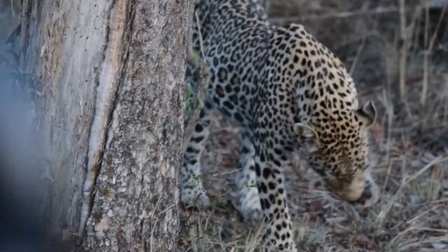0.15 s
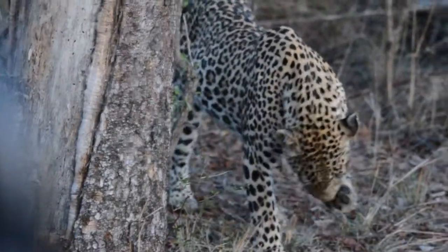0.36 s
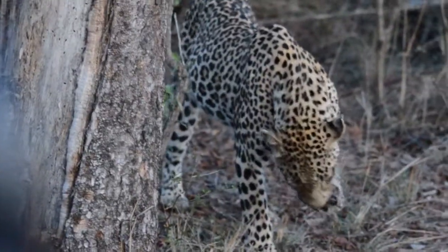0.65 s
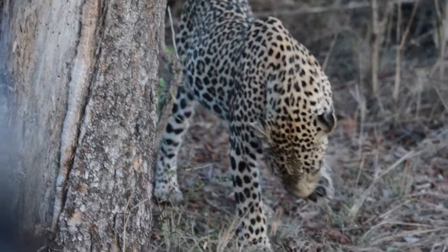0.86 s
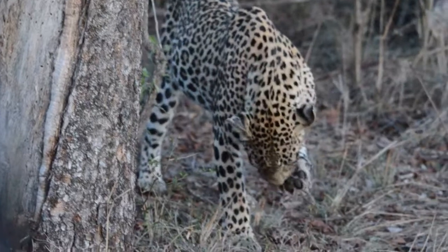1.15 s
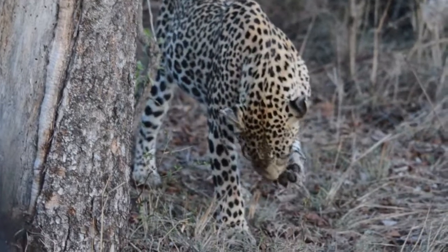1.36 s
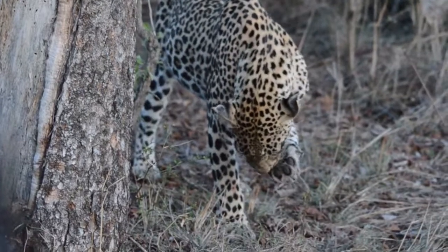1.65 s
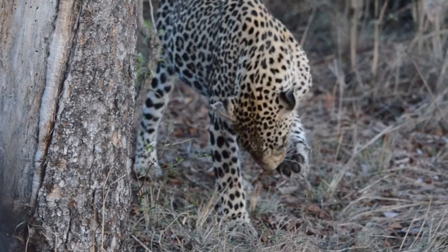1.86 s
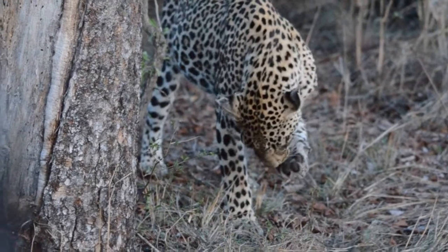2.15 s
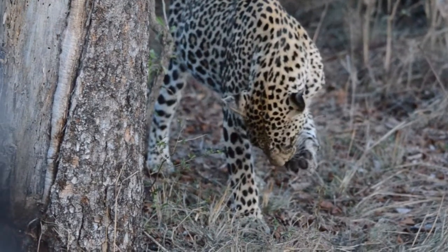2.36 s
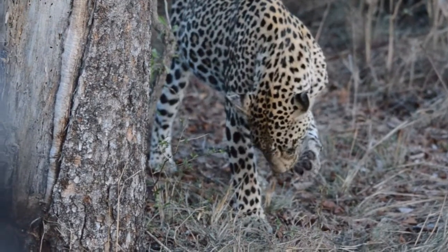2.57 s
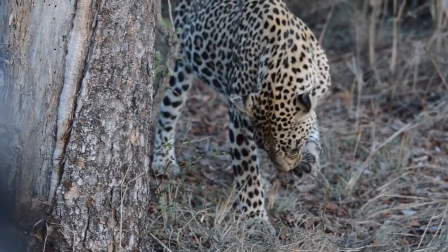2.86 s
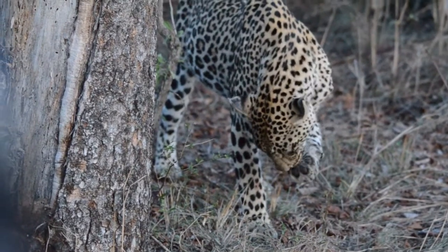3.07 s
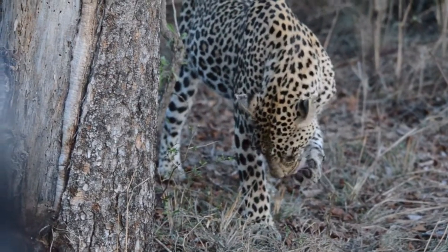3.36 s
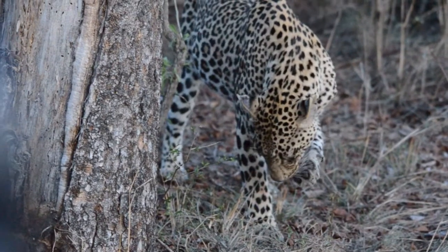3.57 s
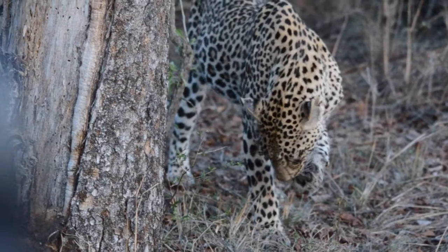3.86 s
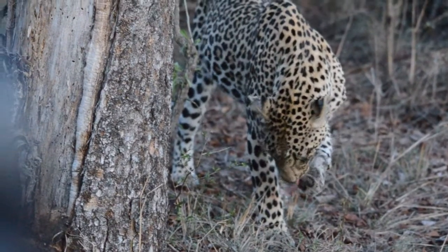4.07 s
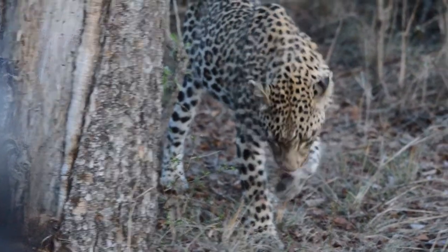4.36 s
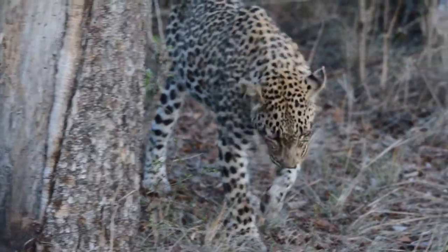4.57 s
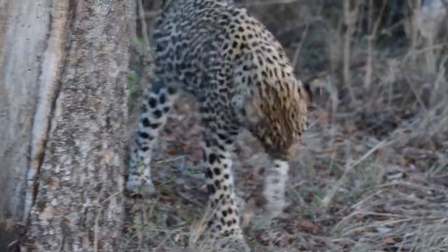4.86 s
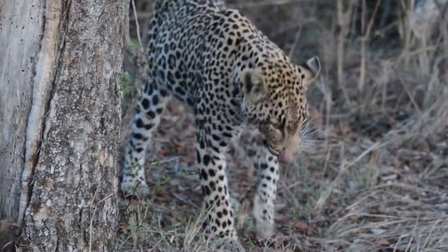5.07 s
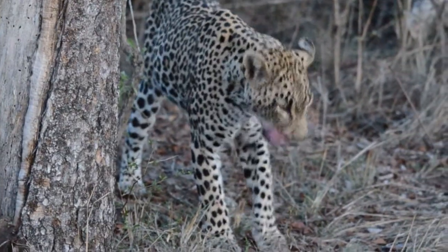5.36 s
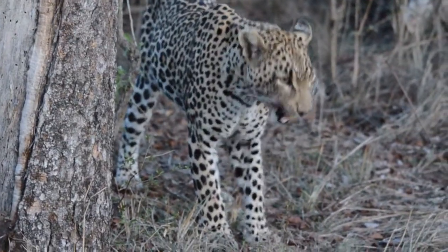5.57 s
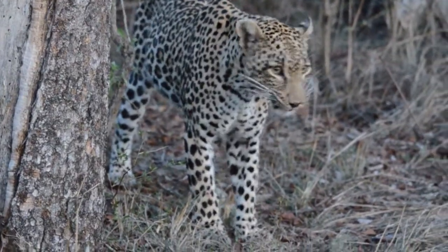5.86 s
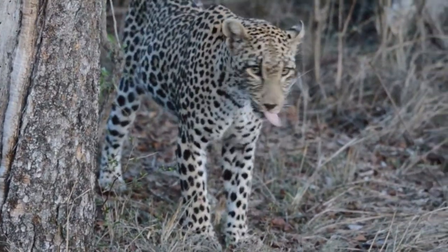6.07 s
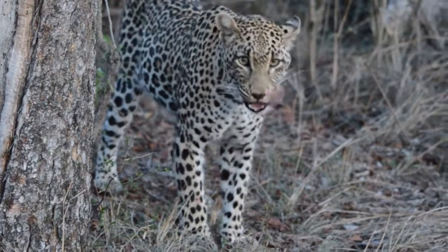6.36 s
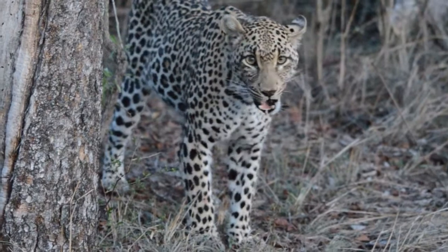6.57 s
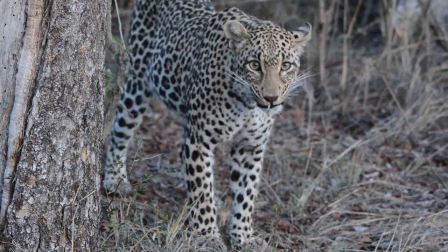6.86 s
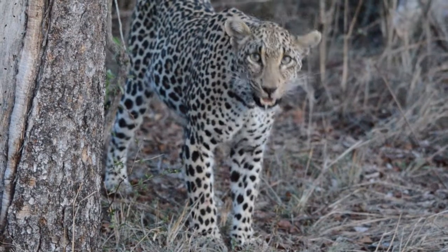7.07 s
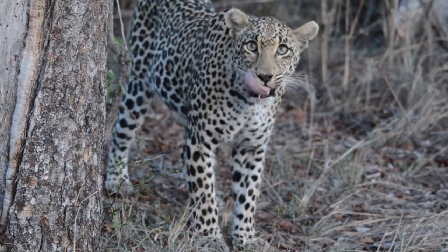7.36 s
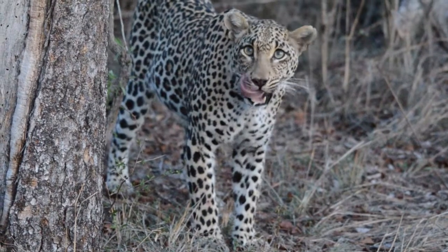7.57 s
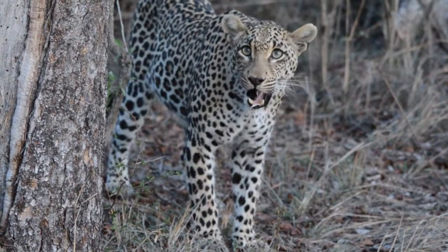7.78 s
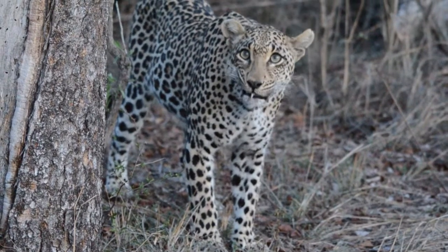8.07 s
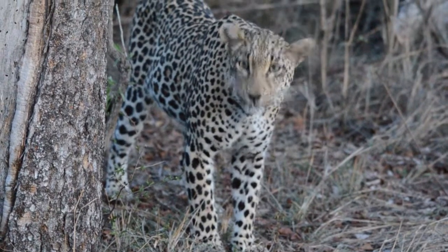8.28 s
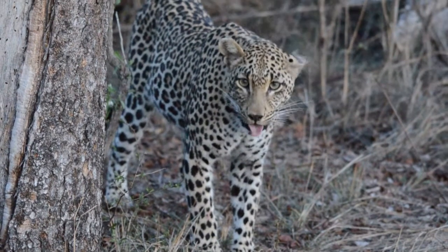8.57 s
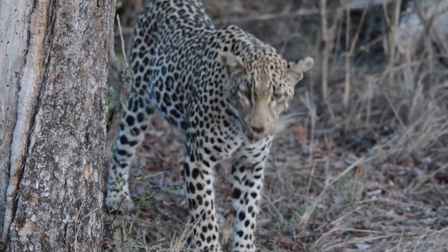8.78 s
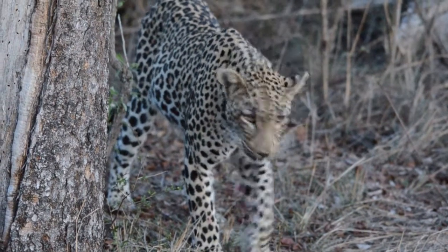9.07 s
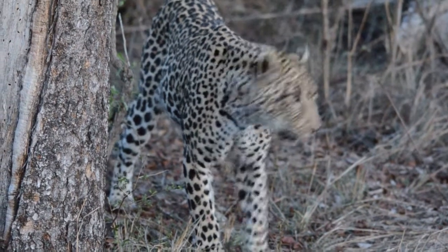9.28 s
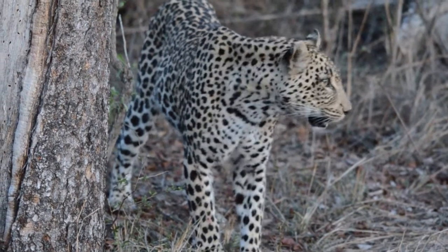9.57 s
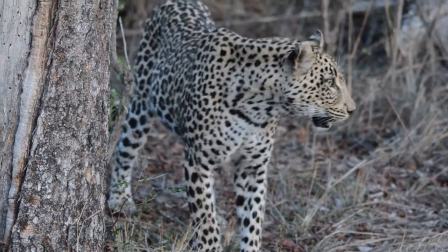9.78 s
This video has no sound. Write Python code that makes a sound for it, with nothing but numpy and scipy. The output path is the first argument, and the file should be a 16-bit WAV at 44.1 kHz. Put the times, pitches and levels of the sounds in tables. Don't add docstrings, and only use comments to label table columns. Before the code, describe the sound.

In dry open bush, cicadas keep up a very high, buzzing drone throughout. A ground bird a few steps away gives five quick calls, each a harsh squawk, falling whistle and short note echoing among trunks. Twigs crack nearby and fingers bump the handheld microphone. After four seconds the bird stops; a heavier thud and brief leaf swish follow, then faint distant birds chatter beneath the insects.

```python
import sys
import numpy as np
from scipy import signal
from scipy.fft import rfft, irfft, next_fast_len
from scipy.io import wavfile
from scipy.ndimage import uniform_filter1d

SR = 44100
rng = np.random.default_rng(int(sys.argv[2]) if len(sys.argv) > 2 else 0)


def dump(signal):
    limited = np.clip(np.atleast_2d(signal).T, -1, 1)
    pcm = np.round(limited * 32767).astype(np.int16)
    wavfile.write(sys.argv[1], SR, pcm)


def boost(x):
    u = np.asarray(x, float) / 20
    return 10 ** u


N = 437031
T = np.arange(N) / SR
EDGE_DB = 23

# (time [s], pitch [Hz], loudest after [s], level [dB], depth of the dips [dB])
FALLING_WHISTLES = [
    (0.443, 2416, 0.024, -28.5, 22),
    (1.205, 2420, 0.03, -29, 23),
    (1.972, 2423, 0.044, -29, 11),
    (2.723, 2420, 0.034, -30.5, 4),
    (3.533, 2409, 0.037, -29.5, 8),
]
# (full strength from [s], level [dB])
SHORT_NOTES = [(0.621, -34), (1.372, -33), (2.147, -33), (2.941, -34.5), (3.762, -34.5)]
# (full strength from [s], note level [dB], rasp level [dB])
OPENING_NOTES = [(0.043, -37, -43), (0.801, -35, -44.5), (1.547, -36, -44.5), (2.328, -34, -44.5),
                 (3.134, -33.5, -44.5)]


def rms_one(x):
    return x / np.sqrt(np.mean(x ** 2) + 1e-20)


def envelope(rows, column=1):
    rows, gain = np.array(rows), np.zeros(N)
    start, end = rows[0, 0], rows[-1, 0]
    at = slice(max(round(start * SR) - 400, 0), round(end * SR) + 400)
    fade = np.clip(np.minimum(T[at] - start, end - T[at]) / 0.004 + 1, 0, 1)
    gain[at] = fade * boost(np.interp(T[at], rows[:, 0], rows[:, column]))
    return gain


def burst(s, db, rise_s, hold_s, sag_db, fall_s):
    held_until, held_db = s + hold_s, db - sag_db
    return envelope([(s - rise_s, db - EDGE_DB), (s, db), (held_until, held_db),
                     (held_until + fall_s, held_db - EDGE_DB)])


def colour(x, spectrum):
    size = next_fast_len(N)
    hz, db = np.transpose(spectrum)
    gain = boost(np.interp(np.log(np.fft.rfftfreq(size, 1 / SR) + 1), np.log(hz), db))
    return rms_one(irfft(rfft(x, size) * gain, size)[:N])


def drift(rate):
    r = np.exp(-80 * np.pi * rate / SR)
    slow = signal.lfilter([1], [1, -2 * r, r * r], rng.standard_normal(N // 40 + 2002))[2000:]
    return np.interp(np.arange(N) / 40, np.arange(len(slow)), rms_one(slow))


def resonance(x, hz, width):
    r = np.exp(-np.pi * width / SR)
    poles = [1, -2 * r * np.cos(2 * np.pi * hz / SR), r * r]
    return signal.lfilter(np.array([1, 0, -1]) * (1 - r * r) / 2, poles, x)


def ring(clicks, hz, t60):
    r, w = boost(-60 / (t60 * SR)), 2 * np.pi * hz / SR
    return signal.lfilter([0, np.sin(w)], [1, -2 * r * np.cos(w), r * r], clicks + 1e-18)


def scatter(x, t60):
    t = T[:SR]
    tail = rng.standard_normal(SR) * boost(-60 * t / t60) * np.clip(t / (0.035 * t60), 0, 1)
    return signal.fftconvolve(x, tail / np.sqrt(np.sum(tail ** 2)))[:N]


def glides(notes, rough_db):
    out, waver = np.zeros(N), 1 + 0.0023 * drift(49.4)
    for s, length, start_hz, end_hz, db in notes:
        at = slice(round(s * SR), min(round((s + length) * SR), N))
        along = (T[at] - s) / length
        hz = start_hz + (end_hz - start_hz) * along
        phase = 2 * np.pi * np.cumsum(hz * waver[at]) / SR
        out[at] += boost(db) * np.clip(np.sin(np.pi * along), 0, 1) ** 0.04 * np.sin(phase)
    return out * boost(rough_db * drift(27))


def air():
    # (frequency [Hz], level [dB per Hz])
    hush_spectrum = [(15, -40), (25, -4), (366, 0), (579, -1), (1230, -2.5), (1590, -4.5), (2400, -2.5),
                     (3710, -15), (5230, -10), (5600, -19), (6000, -3), (7800, -51), (13200, -120)]
    # (time [s], level [dB])
    stirring = [
        (0.0, -62),
        (0.25, -60.5),
        (1.38, -63.5),
        (2.34, -59.5),
        (2.76, -61),
        (3.31, -56.5),
        (3.97, -61.5),
        (7.7, -67.5),
        (9.91, -68),
    ]
    hush = colour(rng.standard_normal(N), hush_spectrum)
    return envelope(stirring) * boost(3.0 + 1.0 * drift(9.9)) * hush


def chatter():
    # (loudest at [s], level [dB], rise [s], fall [s])
    swells = [(4.0, -70, 0.027, 0.14), (4.368, -52.5, .08, 0.082), (4.66, -63, 0.033, 0.025),
              (4.9, -49, .02, 0.14), (5.6, -62, .1, 0.079), (5.95, -59, 0.27, .4), (6.4, -75, .1, .1),
              (6.66, -67, .08, .04), (6.81, -65, .1, 0.021), (7.13, -65, .15, 0.16), (7.28, -62, .02, .04),
              (7.43, -62, .07, 0.02), (7.57, -62, 0.22, 0.063), (7.73, -60, .06, 0.062),
              (7.95, -52.5, 0.29, 0.032), (8.12, -56, .03, 0.11), (8.33, -59, .02, 0.17),
              (8.52, -55, 0.081, 0.32), (9.14, -57, 0.078, 0.42), (9.84, -60, .15, .4)]
    white = rng.standard_normal(N)
    bands = np.zeros(N)
    for hz in (1850, 2060, 2250, 2450, 2650, 2850, 3050):
        narrow = resonance(resonance(white, hz, 187), hz, 184)
        bands += boost(5.0 * drift(18)) * narrow
    bands /= np.sqrt(uniform_filter1d(bands ** 2, size=3000))
    gain = sum(burst(s, db, rise, 0, 0, fall) for s, db, rise, fall in swells)
    return gain * boost(-8.0) * bands


def cicadas():
    # (time [s], level [dB])
    chorus = [(0.0, -37), (0.22, -36), (1.43, -35.5), (1.57, -37.5), (1.87, -37), (1.93, -35.5),
              (1.99, -37.5), (3.89, -36), (4.14, -38.5), (4.74, -37), (4.86, -41.5), (4.94, -36.5),
              (5.57, -39), (5.66, -36.5), (5.74, -37.5), (9.69, -37), (9.74, -36), (9.91, -37)]
    # (tymbal strokes [per s], share [dB], rate wobble [0-1], later ribs [dB])
    singers = [
        (433, -3, .013, -14),
        (319, 0, .0065, -6),
        (368, -7, .008, -6),
        (276, -8, .008, -4),
    ]
    later_ribs = [.33, .6]
    # (frequency [Hz], level [dB per Hz])
    body = [(2530, -41), (4980, -32.5), (5690, -29.5), (6120, -24.5), (6710, -22.5), (7500, -12),
            (8300, -5.5), (9250, -0.5), (9860, -3), (11000, -11), (11800, -22.5), (12400, -29),
            (13000, -37.5), (14300, -48), (16700, -80), (22000, -120)]
    # (frequency [Hz], width [Hz], level [dB])
    fine_modes = [(6070, 96, -1), (7040, 90, 11), (7150, 130, 1), (7700, 150, -5), (7980, 80, -2),
                  (8250, 120, 4), (8720, 94, -0.5), (9400, 130, 1), (9450, 94, 7.5), (9870, 62, -7),
                  (10500, 82, -5), (10900, 130, 6), (11520, 180, 7), (12540, 130, 8)]
    clicks = np.zeros(N)
    for rate_hz, share_db, wobble, ribs_db in singers:
        phase = np.cumsum(rate_hz * (1 + wobble * drift(14))) / SR
        strength = boost(share_db + 2.15 * drift(4.2) + 1.0 * rng.standard_normal(N))
        for place, rib_db in zip([0, *later_ribs], (0, ribs_db, ribs_db)):
            cycles = np.floor(phase - place * (1 + 0.022 * drift(1.5)))
            at = np.flatnonzero(np.diff(cycles) > 0)
            clicks[at] += strength[at] * boost(rib_db)
    clicks = rms_one(signal.sosfilt(signal.butter(4, 5900, "high", fs=SR, output="sos"), clicks))
    sway = 2 * drift(1.5)
    blur = np.cos(sway) * scatter(clicks, t60=0.038) + np.sin(sway) * scatter(clicks, t60=0.038)
    heard = clicks + boost(-3) * blur + boost(-3.5) * rng.standard_normal(N)
    ripple = sum(boost(db + 2.1 * drift(5.0)) * resonance(heard, hz, width) for hz, width, db in fine_modes)
    drone = colour(heard + 0.11 * ripple, body)
    drone /= np.sqrt(uniform_filter1d(drone ** 2, size=4000))
    return envelope(chorus) * boost(0.44 + 0.78 * drift(3.5)) * drone


def far_birds():
    # (time [s], length [s], start [Hz], end [Hz], level [dB])
    small_bird = [
        (2.887, 0.026, 5750, 6550, -50),
        (2.909, .022, 6550, 6700, -44.5),
        (2.935, 0.032, 5200, 5120, -40.5),
    ]
    # (time [s], length [s], start [Hz], end [Hz], level [dB])
    far_notes = [(4.06, .11, 1880, 1870, -64), (4.913, .105, 2792, 2782, -62),
                 (5.018, .112, 2781, 2776, -67), (5.106, .03, 1940, 1620, -65),
                 (5.501, .029, 2590, 2481, -60), (5.529, .091, 2472, 2488, -59),
                 (6.301, .048, 2555, 2452, -60), (6.346, .074, 2451, 2452, -59),
                 (6.481, .058, 2461, 2459, -67), (7.066, .069, 2655, 2352, -59),
                 (7.101, .094, 2495, 2432, -61), (7.136, .035, 2340, 1860, -64),
                 (7.415, .025, 2395, 2255, -64), (7.716, .041, 2645, 2455, -62),
                 (7.821, .034, 3090, 2955, -68), (7.881, .088, 2488, 2462, -62),
                 (7.929, .052, 2152, 2148, -67), (8.212, .049, 2390, 2255, -66),
                 (8.461, .022, 3052, 3048, -68), (8.468, .026, 2480, 2420, -64),
                 (8.491, .094, 3058, 3032, -63), (8.492, .044, 2058, 2042, -68),
                 (8.576, .03, 2355, 2420, -63), (8.671, .079, 2452, 2441, -63),
                 (8.758, .028, 2122, 2102, -68), (9.071, .031, 4062, 4068, -62),
                 (9.076, .034, 2455, 2342, -59), (9.089, .021, 3552, 3542, -65),
                 (9.116, .109, 3048, 3002, -65), (9.121, .045, 2068, 2062, -68),
                 (9.126, .019, 3552, 3548, -68), (9.131, .031, 4058, 4052, -62),
                 (9.176, .054, 3562, 3552, -69), (9.541, .022, 1660, 1650, -68),
                 (9.666, .036, 3340, 3190, -66), (9.697, .046, 2475, 2382, -58),
                 (9.751, .035, 2472, 2498, -55), (9.772, .088, 2372, 2352, -58),
                 (9.791, .08, 2562, 2568, -65), (9.801, .109, 3010, 2945, -58)]
    # (time [s], length [s], start [Hz], end [Hz], level [dB])
    hoarse_chirps = [(4.861, .034, 2452, 2468, -64), (5.051, .049, 2495, 2402, -66),
                     (5.061, .039, 2005, 2195, -67), (5.436, .024, 2195, 2102, -65),
                     (5.631, .024, 2152, 2168, -64), (6.581, .039, 2052, 2195, -67),
                     (6.641, .039, 2445, 2302, -65), (6.781, .039, 2495, 2105, -66),
                     (6.782, .019, 2852, 2848, -67), (7.001, .024, 2545, 2305, -66),
                     (7.271, .024, 2102, 2098, -64), (7.286, .029, 2552, 2598, -65),
                     (7.371, .049, 1855, 2045, -65), (7.421, .024, 2802, 2828, -65),
                     (7.481, .019, 2148, 2102, -66), (8.096, .019, 1905, 2045, -66),
                     (8.116, .044, 2645, 2505, -65), (8.316, .024, 2102, 2195, -66),
                     (8.331, .034, 2405, 2645, -66), (8.366, .029, 2298, 2282, -67),
                     (8.406, .024, 2448, 2432, -66), (8.511, .075, 2795, 2722, -61),
                     (8.521, .069, 2945, 2882, -66), (8.601, .069, 2545, 2452, -65),
                     (8.621, .049, 2145, 2052, -66), (8.861, .024, 2002, 2028, -66),
                     (9.061, .029, 3245, 3152, -67), (9.111, .059, 2495, 2452, -65),
                     (9.131, .079, 2895, 2722, -61), (9.201, .039, 2445, 2252, -63),
                     (9.787, .019, 3495, 3152, -64), (9.801, .099, 2145, 2052, -65),
                     (9.851, .058, 3595, 3305, -66)]
    clear = glides([*small_bird, *far_notes], rough_db=2.0) * (1 + 0.15 * drift(70))
    return clear + glides(hoarse_chirps, rough_db=2.0) * (0.6 + 0.8 * drift(110))


def creaks():
    # (time [s], length [s], start [Hz], end [Hz], level [dB])
    seat = [
        (3.09, 0.25, 112, 114, -58),
        (3.37, 0.086, 255, 292, -60.5),
    ]
    return glides(seat, rough_db=2.5)


def bumps():
    # (time [s], peak level [dB], pitch [Hz])
    knocks = [(0.37, -53, 263), (0.428, -59, 367), (0.498, -54, 233), (1.521, -48, 640),
              (1.609, -62, 127.7), (2.339, -62, 715), (2.754, -57, 594), (3.014, -47, 339),
              (3.389, -54, 264), (3.519, -46.5, 429), (4.028, -50, 103), (4.388, -46.5, 250),
              (4.683, -35.5, 133), (4.831, -51, 186), (5.079, -50, 91.5), (5.415, -46.5, 194),
              (5.769, -50, 258), (0.55, -52, 100), (0.599, -54, 95), (4.875, -49, 90), (5.44, -54, 80),
              (5.76, -48, 90)]
    out = np.zeros(N)
    t = T[:SR // 10]
    for s, db, hz in knocks:
        knock = np.sin(2 * np.pi * hz * t) + 0.5 * np.sin(2 * np.pi * 1.56 * hz * t)
        out[round(s * SR):][:len(t)] += boost(db + 5.5 - 60 * t / 0.045) * np.clip(t / 0.0079, 0, 1) * knock
    return out


def rustle():
    # (loudest at [s], level [dB], rise [s], fall [s])
    rubs = [
        (0.0, -59, .01, 0.038),
        (.054, -50, .01, 0.17),
        (5.1, -65.5, 0.13, 0.038),
        (5.404, -66.5, 0.024, 0.23),
    ]
    rub = resonance(resonance(rng.standard_normal(N), 680, 1260), 680, 1260)
    gain = sum(burst(s, db, rise, 0, 0, fall) for s, db, rise, fall in rubs)
    return gain * boost(4.5 + 3.7 * drift(52)) * rms_one(rub)


def swish():
    # (time [s], level [dB])
    brush = [
        (4.675, -57),
        (4.705, -39),
        (4.755, -42),
        (4.897, -66.5),
        (4.915, -64),
        (4.95, -70),
    ]
    # (frequency [Hz], level [dB per Hz])
    leaf_spectrum = [(410, -26), (700, -16), (1020, -21), (1600, -6), (2480, -3.5), (2770, -8),
                     (4250, -1.5), (5620, -10), (9260, -11), (12900, -25), (16700, -55), (22000, -120)]
    grains = rng.standard_normal(N) * boost(4.0 * np.minimum(rng.exponential(1, N), 5))
    return envelope(brush) * boost(3.5) * colour(grains, leaf_spectrum)


def snaps():
    # (time [s], peak level [dB], low part [dB], splinter level [dB], splinter pitch [Hz])
    twigs = [
        (0.1764, -27, -18, -18, 8150),
        (1.9315, -11, -16, -40, 4700),
        (3.192, -25.5, -32, -17, 2950),
        (3.1925, -62, -20, -36, 14120),
        (3.204, -60, -20, -40, 14000),
        (3.3797, -37, -11, -55, 3060),
        (3.681, -43, 1, -38.5, 500),
        (7.1662, -47, -4, -41, 3030),
        (7.7244, -57, -1, -63, 3030),
    ]
    # (frequency [Hz], level [dB], t60 [s])
    bright_modes = [(4150, 5, .0085), (5250, 2, .007), (6300, 1, .005), (7500, 3, .0035), (11000, -8, .003)]
    # (frequency [Hz], level [dB], t60 [s])
    low_modes = [(1910, 1, 0.024), (1010, 5, 0.009), (657, -7.5, 0.061), (420, -8, 0.018)]
    bright, low, out = np.zeros((3, N))
    t = T[:SR // 20]
    for s, db, low_db, splinter_db, hz in twigs:
        at = round(s * SR)
        bright[at + 3], low[at + 3] = boost(db - 5.0), boost(db + low_db)
        out[at:at + len(t)] += boost(splinter_db - 60 * t * hz / 21) * np.sin(2 * np.pi * hz * t)
    for clicks, modes in ((bright, bright_modes), (low, low_modes)):
        for k, (hz, db, t60) in enumerate(modes):
            out = out + boost(db) * ring(clicks, hz, t60) * (-1) ** k
    return out


def falling(s, start_hz, top_s, db, dip_db):
    # (after [s], width [s], deeper by [dB])
    level_dips = [
        (.029, 0.0065, 2),
        (.094, 0.0075, 3),
    ]
    length_s, rise_db, drop_db = 0.112, 12, 8.5
    over_hz, settle_s, sag_hz_per_s = 130.3, 0.02, 1050
    t = np.sort(np.append(np.linspace(0, length_s, 45), top_s))
    hz = start_hz + over_hz * np.exp(-t / settle_s) - sag_hz_per_s * t
    swell = rise_db * (1 - t / top_s) ** 2
    fade = drop_db * ((t - top_s) / (length_s - top_s)) ** 2
    level = db - np.where(t < top_s, swell, fade)
    for after, width, depth_db in level_dips:
        level -= (dip_db + depth_db) * np.exp(-((t - after) / width) ** 2)
    second = db - 15.5 - 4.5 * (1.87 * t / length_s - 1) ** 2
    return [tuple(row) for row in np.transpose([s + t, hz, level, second])]


def note(s, db, times, pitches, levels):
    rise_s, hold_s, fall_s = times
    start_hz, top_hz, end_hz = pitches
    rise_db, sag_db, second_db, early_db = levels
    rows = [(-rise_s, start_hz, -rise_db, early_db), (0, (start_hz + top_hz) / 2, 0, 0),
            (hold_s / 2, top_hz, 0, 0), (hold_s, end_hz, -sag_db, 0),
            (hold_s + fall_s, end_hz, -sag_db - EDGE_DB, 0)]
    return [(s + t, hz, db + rel, db + rel + second_db + less) for t, hz, rel, less in rows]


def whistles(notes, third_db):
    first_gain, second_gain = [sum(envelope(rows, column=k) for rows in notes) for k in (2, 3)]
    s, hz = np.transpose(sorted(row[:2] for rows in notes for row in rows))
    phase = 2 * np.pi * np.cumsum(np.interp(T, s, hz) * (1 + 0.00197 * drift(63.0))) / SR
    upper = boost(3 * drift(90)) * (np.sin(2 * phase) + boost(third_db) * np.sin(3 * phase))
    return np.sqrt(2) * (first_gain * boost(1.0 * drift(59)) * np.sin(phase) + second_gain * upper)


def squawks():
    # (frequency [Hz], width [Hz], level [dB])
    throat = [(1294, 440, 2), (2278, 280, 14.5), (3030, 1000, 8), (4460, 2400, 4)]
    # (after the note [s], over the rasp [dB], rise [s], hold [s], sag [dB], fall [s])
    opening_parts = [
        (0.001, -2, 0.059, 0.064, 3.5, .015),
        (0.067, 2, 0.02, 0.099, 2.5, .025),
        (0.228, -4.5, 0.046, 0.019, 0.5, 0.023),
    ]
    # (after the note [s], level [dB], rise [s], hold [s], sag [dB], fall [s])
    falling_parts = [(-0.012, -46, 0.02, 0.013, 2.9, 0.02)]
    # (after the note [s], level [dB], rise [s], hold [s], sag [dB], fall [s])
    short_parts = [
        (-.014, -49.5, 0.052, 0.029, 2.5, 0.027),
        (.031, -46.5, 0.0065, 0.0036, 3.8, 0.084),
    ]
    phase = np.cumsum(1150 * (1 + 0.035 * drift(50))) / SR
    pulses = rms_one(np.diff(np.floor(phase), prepend=0) * (1 + 0.45 * rng.standard_normal(N)))
    pulses += 2.06 * rng.standard_normal(N)
    voice = sum(boost(db) * resonance(pulses, hz, width) * (-1) ** k for k, (hz, width, db) in enumerate(throat))
    whistle_left = 0.35 * np.sin(4 * np.pi * phase) + 0.12 * np.sin(8 * np.pi * phase)
    voice = rms_one(voice) + boost(2.1 * drift(90)) * whistle_left
    stutter = np.cos(2 * np.pi * np.cumsum(68 * (1 + 0.1996 * drift(19.44))) / SR)
    voice *= boost(2.5 * stutter)
    cues = [(s, rasp_db, opening_parts) for s, _, rasp_db in OPENING_NOTES]
    cues += [(row[0], 0, falling_parts) for row in FALLING_WHISTLES]
    cues += [(row[0], 0, short_parts) for row in SHORT_NOTES]
    gain = np.zeros(N)
    for s, db, parts in cues:
        for after, part_db, *shape in parts:
            gain += burst(s + after, db + part_db, *shape)
    return gain * boost(5.5 + 1.2 * drift(160)) * rms_one(voice)


def breaks():
    # (after the note [s], length [s], start [Hz], end [Hz], level [dB])
    opening_under = [(0.06, 0.1, 1130, 1155, -60), (0.225, 0.06, 1520, 1410, -56)]
    opening_clicks = [(0.028, 0.005, 4200, 3000, -42), (0.07, 0.006, 3900, 3100, -45)]
    short_under, short_clicks = [(0.015, 0.034, 1018, 1013, -54)], [(0.024, 0.006, 4000, 2900, -43)]
    notes = [(row[0] - 0.013, 0.02, 2900, 3350, -40) for row in FALLING_WHISTLES]
    notes += [(s - length / 2, 1.3 * length, 4300, 5500, db - 9) for s, length, _, _, db in notes]
    for rows, parts in ((OPENING_NOTES, opening_under + opening_clicks),
                        (SHORT_NOTES, short_under + short_clicks)):
        notes += [(row[0] + after, *rest) for row in rows for after, *rest in parts]
    return glides(notes, rough_db=2.0) * (0.4 + 0.8 * drift(150))


def ground_bird():
    brief = [note(s, db, (0.016, 0.024, 0.005), (2030, 2072, 2062), (8, 3, -5.5, -34)) for s, db in SHORT_NOTES]
    brief += [note(s, db, (0.012, 0.024, 0.012), (2380, 2340, 2260), (22, -2, -8.5, -22))
              for s, db, _ in OPENING_NOTES]
    falls = [falling(*row) for row in FALLING_WHISTLES]
    return whistles(falls, third_db=-22) + whistles(brief, third_db=-13) + squawks() + breaks()


def tree_echoes(bird, far):
    leaves = 0.4 + 1.0 * drift(88)
    sway = 2 * drift(3.0)
    close = np.cos(sway) * scatter(bird * leaves, t60=0.41) + np.sin(sway) * scatter(bird * leaves, t60=0.54)
    deep = resonance(scatter(bird * (1 + 0.38 * leaves), t60=1.42), 2200, 2900)
    answers = scatter(far * leaves, t60=0.45)
    return resonance(boost(-8) * close + boost(-11.5) * deep + boost(-7.5) * answers, 2400, 2200)


def scene():
    bird, far = ground_bird(), far_birds()
    echoes = tree_echoes(bird, far)
    near = snaps() + swish()
    bird = signal.sosfilt(signal.butter(2, 9000, fs=SR, output="sos"), bird)
    bright = bird + far + echoes + near + boost(-17.0) * scatter(near, t60=0.068)
    small_source = signal.butter(2, [400, 15000], "band", fs=SR, output="sos")
    bright = signal.sosfilt(small_source, bright)
    return (air() + chatter() + cicadas() + creaks() + bumps() + rustle() + bright)[None]


def low_pass(x):
    return signal.sosfilt(signal.butter(12, 14500, fs=SR, output="sos"), x)


def record(dry):
    # (frequency [Hz], width [Hz], depth [0-1])
    port_dips = [(5620, 420, .72), (5800, 300, .4), (6900, 90, .8), (10530, 110, .45), (11040, 200, .45)]
    dry = signal.sosfilt(signal.butter(2, 55, "high", fs=SR, output="sos"), dry)
    for hz, width, depth in port_dips:
        dry = dry - depth * resonance(dry, hz, width)
    return low_pass(dry)


dry = scene()
out = record(dry)
dump(out)
```